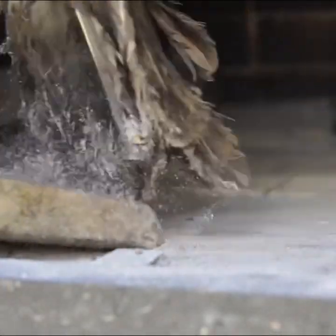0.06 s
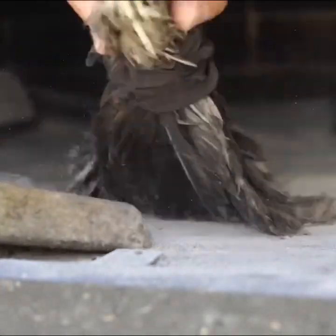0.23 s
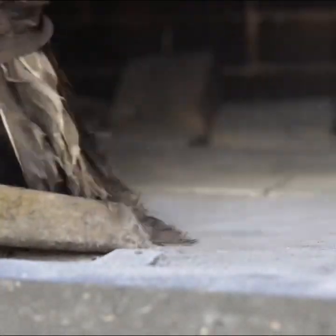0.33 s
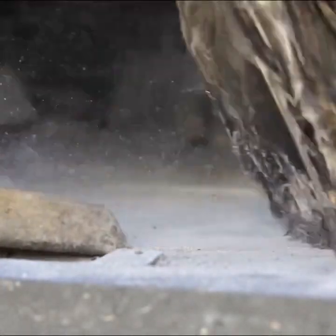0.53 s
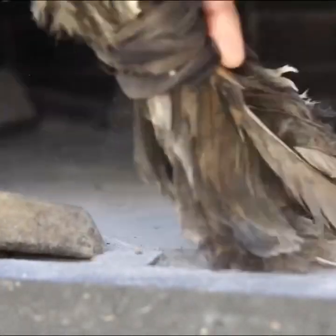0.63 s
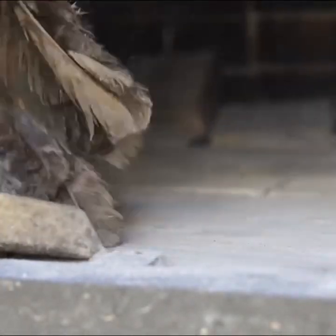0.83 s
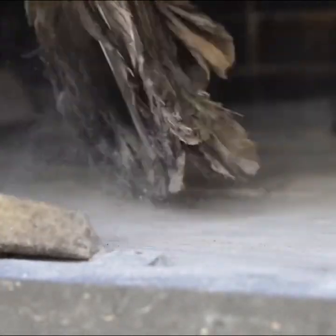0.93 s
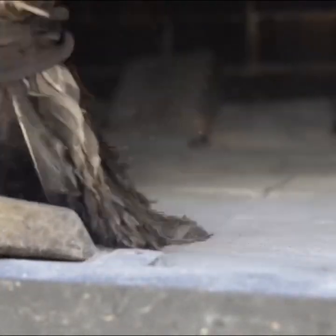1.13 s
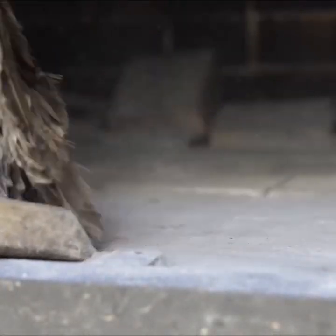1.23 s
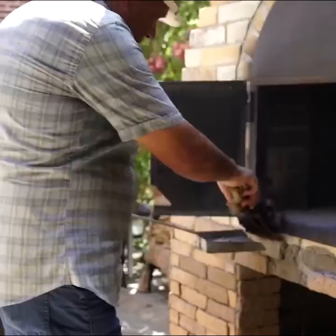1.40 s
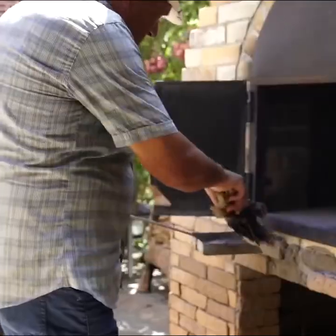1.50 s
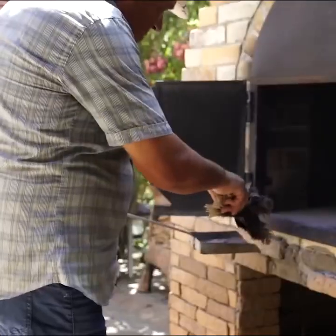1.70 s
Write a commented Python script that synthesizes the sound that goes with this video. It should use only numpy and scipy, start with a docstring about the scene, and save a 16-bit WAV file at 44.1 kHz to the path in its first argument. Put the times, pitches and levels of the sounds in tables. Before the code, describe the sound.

Feathers brush over a stone oven floor three times, quills crackling and snapping close by.

```python
"""A bundle of feathers sweeps the stone floor of a brick oven in three strokes, close by.
First come a small snap and a soft, low bump. Then each stroke lands with a crunch of bending quills,
a few of which snap past one another, and trails off as the soft vanes swish over gritty stone.
The oven rings faintly behind each stroke. Near 1.4 seconds the close sound stops abruptly,
and one last faint, distant stroke is heard over the hush of the yard outside."""
import sys
import numpy as np
from scipy import signal
from scipy.fft import rfft, irfft
from scipy.io import wavfile
from scipy.ndimage import uniform_filter1d

SR = 44100
rng = np.random.default_rng(int(sys.argv[2]) if len(sys.argv) > 2 else 0)


def generate_wav(signal):
    """Clip the signal to [-1, 1] and save it as 16-bit WAV at the path in sys.argv[1]."""
    frames = np.transpose(np.atleast_2d(signal))
    scaled = np.clip(frames, -1, 1) * 32767
    pcm = np.round(scaled).astype(np.int16)
    wavfile.write(sys.argv[1], SR, pcm)


N = 77175
T = np.arange(N) / SR  # time in seconds
SWISH_SLIPS_PER_S = 14000

# The notes a quill rings at. Each row: pitch in Hz, width in Hz, relative level in dB.
QUILL_NOTES = [(3525, 58, -2), (4115, 51, -14.5), (4720, 95, -14.5)]
# The notes a feather's stiff shaft rings at. Each row: pitch in Hz, width in Hz, relative level in dB.
SHAFT_NOTES = [(1580, 80, 0), (2221, 37, 3.5), (2330, 37, -3), (2569, 120, 2.5), (2593, 68, -7)]
# The bright tone of a feather's crack. Each row: frequency in Hz, relative level in dB.
CRACK_TONE = [(200, -30), (600, -5), (1800, -21), (3100, -26), (4400, 1.5), (5100, -2.5), (6400, 5.5),
              (7600, 2), (8400, -4), (12000, -7), (16000, -9)]


def vanes():
    """The soft sides of the feathers drag over grit: tiny slips whose level and tone follow the hand."""
    # How the vanes rub the stone, in consecutive stretches that join into one curve. # Each row: time in
    # seconds, relative level in dB, treble lift in dB, bass lift in dB.
    rubs = [
        [(0.0, -44, 9, 4), (0.01, -42.5, 7, -18), (0.05, -54.5, -6.5, 0), (0.078, -53, -6.5, 4),
         (0.14, -78, -1, -24), (0.16, -86, -11, 0)],
        [(0.16, -65.5, -1, -3), (0.248, -33.5, 2.5, -17), (0.296, -38, 3.5, 9), (0.416, -46.5, 2, 12.5),
         (0.48, -71, 3, 11)],
        [(0.48, -71, 9.5, 0), (0.552, -35, -1, 3), (0.61, -22, 12, 3), (0.62, -20, -3.5, 4),
         (0.666, -29, 9, -7), (0.68, -42, -2, -8)],
        [(0.68, -14, -4, -21), (0.772, -40, 2, -19), (0.812, -46, -9.5, -13), (0.838, -49.5, 1.5, -2),
         (0.89, -65.5, 5, 4), (0.944, -68, -16, 0), (0.95, -82, 0, -4)],
        [(0.95, -75, -6.5, 5), (1.006, -54, -6, 4), (1.016, -71, 7, 4), (1.034, -53, -9, 20),
         (1.048, -68, 9, -4), (1.068, -37.5, -9, 3), (1.09, -38.5, -11, -4)],
        [(1.09, -42.5, 4, -10), (1.102, -40, 7.5, 0), (1.128, -40.5, -4, 5.5), (1.168, -37, 5.5, -11),
         (1.24, -48.5, -1.5, 7)],
        [(1.24, -50, 5, -2), (1.264, -60, -8, 1), (1.27, -41.5, 3, -5), (1.288, -67, 5, -6), (1.35, -86, 5, -6),
         (1.354, -68.5, 2, 0), (1.42, -53.5, 0.5, -6)],
    ]
    # The tone of the swish. Each row: frequency in Hz, relative level in dB.
    swish_tone = [(100, -31), (250, -18.5), (420, -6), (600, -5.5), (780, -2.5), (950, -4.5), (1400, -1.5),
                  (1900, -4), (2700, 1), (3800, -4), (6200, -3.5), (7400, -7), (8600, -15), (16000, -20.5)]
    times, *columns = np.transpose(np.vstack(rubs))
    level_db, treble_db, bass_db = (np.interp(T, times, column) for column in columns)
    swish = colour(grains(SWISH_SLIPS_PER_S, spread_db=2), swish_tone) * amp(wander(rate_hz=120))
    body, bass = lowpass(swish, hz=2600), lowpass(swish, hz=450)
    middle, treble = body - bass, swish - body
    # Past a certain point, pressing harder mostly bends the quills and adds little swish.
    full_db, boost_db = -37, 3
    give_db = 0.9 * np.maximum(level_db - full_db, 0)
    return amp(boost_db + level_db - give_db) * (amp(bass_db) * bass + middle + amp(treble_db) * treble)


def crunch():
    """Pressed down, bent quills grind together in clumps of clicks over a slightly unsteady hollow note."""
    # The bundle pressing on the stone. Each row: start in seconds, length in seconds,
    # then the levels in dB of the grinding, the shafts, the quills and the hollow note.
    presses = [(0.233, 0.052, -31.5, -39.5, -33, -41), (0.535, 0.073, -30, -32.5, -31, -40.5),
               (0.634, 0.026, -27.5, -26.5, -31.5, -54), (1.098, 0.082, -36, -43.5, -40, -58.5)]
    slips = grains(per_s=4000, spread_db=1.5) * amp(1.64 * wander(rate_hz=150))
    # The tone of the grinding. Each row: frequency in Hz, relative level in dB.
    grind_tone = [(150, -36), (400, -5.5), (1000, 4.5), (1900, -16), (2600, -9), (3150, -24), (3500, 7),
                  (4400, -8.5), (5100, -6), (6400, 9.5), (7500, 2.5), (8400, -0.5), (16000, -13)]
    hollow_hz = 421 * (1 + 0.015 * wander(rate_hz=47))
    hollow = evened(np.sin(2 * np.pi * np.cumsum(hollow_hz) / SR))
    quills = steadied(ring(slips, QUILL_NOTES), span_s=0.012)
    voices = [colour(slips, grind_tone), ring(slips, SHAFT_NOTES), quills, hollow]
    return sum(burst(start, length, rise_s=0.0088, fall_s=0.018) * amp(db) * voice
               for start, length, *levels in presses for db, voice in zip(levels, voices))


def snaps():
    """Each snap is a quick run of clicks in shaft and tips, and sets one quill ringing roughly."""
    # Quills snapping past one another.
    # Each row: start in seconds, then the relative levels in dB of shaft, ringing quill and crack.
    quill_snaps = [(0.006, -36.5, -28, -35.5), (0.1323, -65, -58, -57.5), (0.187, -55, -71, -49),
                   (0.210, -61, -35, -35.5), (0.2355, -53, -43, -25), (0.24, -34, -21, -33),
                   (0.2487, -44, -34, -24.5), (0.254, -41, -18, -26.5), (0.264, -35, -18, -24.5),
                   (0.278, -32.5, -31, -33), (0.2857, -38, -22.5, -49), (0.293, -37, -26, -25),
                   (0.496, -64, -42.5, -41.5), (0.5238, -43, -45.5, -33), (0.548, -41, -31, -32),
                   (0.562, -47, -21.5, -30), (0.575, -23, -15, -18), (0.593, -36.5, -25, -23),
                   (0.602, -27, -15, -39), (0.608, -32, -28, -20), (0.6268, -36, -14.5, -19),
                   (0.6465, -25, -24.5, -24), (0.660, -37, -35, -25.5), (0.690, -31.5, -31, -31),
                   (0.919, -57.5, -52.5, -52.5), (0.979, -62, -54, -46.5), (1.0002, -53.5, -39.5, -40),
                   (1.027, -55, -60, -46), (1.094, -35.5, -33, -25.5), (1.102, -45, -40, -35),
                   (1.107, -37, -39, -32), (1.135, -30.5, -26.5, -27), (1.162, -28, -48, -44),
                   (1.179, -32, -28, -26.5), (1.202, -37.5, -34.5, -28.5), (1.251, -47, -38.5, -41),
                   (1.2668, -38, -30, -33.5), (1.329, -72, -57, -50.5), (1.413, -54, -50, -46.5)]
    # The bright notes of the quill tips. Each row: pitch in Hz, width in Hz, relative level in dB.
    tip_notes = [(5770, 160, 7.5), (6240, 110, 4), (5960, 200, -16.5), (7260, 62, -6), (7260, 120, -2.5),
                 (7350, 78, -3), (7450, 80, -25.5)]
    slips = grains(per_s=7800, spread_db=3)
    shaft = amp(-0.5) * steadied(ring(ring(slips, SHAFT_NOTES), SHAFT_NOTES), span_s=0.005)
    tips = amp(-4.5) * ring(slips, tip_notes)
    crack = amp(-1.5) * steadied(colour(slips, CRACK_TONE) + tips, span_s=0.0087)
    shaky_time = np.cumsum(1 + 0.02203 * wander(rate_hz=296)) / SR  # makes the ringing rattle
    out = np.zeros(N)
    for start, shaft_db, ring_db, crack_db in quill_snaps:
        detune, phase = rng.uniform(-1, 1, 2)
        tuning = 1 + 0.006 * detune  # each quill rings a little higher or lower
        quill = sum(amp(db) * np.sin(2 * np.pi * (hz * tuning * shaky_time + phase))
                    for hz, _, db in QUILL_NOTES)
        clicks = amp(crack_db) * crack + amp(shaft_db) * shaft
        out += burst(start, hold_s=0.0039, rise_s=0.00048, fall_s=0.0044) * clicks
        out += burst(start, hold_s=0.0069, rise_s=0.002, fall_s=0.0014) * amp(ring_db + 1.5) * quill
    return out


def scrape():
    """The bundle sings faintly during the long drag."""
    # The notes of the dragged bundle. Each row: pitch in Hz, width in Hz, relative level in dB.
    notes = [(781, 34, -1), (1233, 110, -4.5)]
    song = steadied(ring(ring(rng.standard_normal(N), notes), notes), span_s=0.038)
    return amp(-42.5) * burst(start_s=0.705, hold_s=0.07, rise_s=0.0043, fall_s=0.0091) * song


def rustle():
    """Loose feather tips give a light, dry crackle as the bundle is swung back."""
    # The rustles between strokes. Each row: start in seconds, length in seconds, level in dB.
    rustles = [(0.459, 0.03, -54.5), (0.502, 0.024, -49.5), (0.527, 0.027, -37), (1.018, 0.03, -52)]
    crackle = colour(grains(per_s=5200, spread_db=3), CRACK_TONE)
    return crackle * sum(amp(db) * burst(start, length, rise_s=0.002, fall_s=0.008)
                         for start, length, db in rustles)


def walls(x):
    """The oven's nearby floor and walls add a few quick echoes."""
    # The first echoes. Each row: delay in seconds, level in dB.
    echoes = [(.0021, -21.5), (.0037, -23), (.0056, -16.5), (.0083, -22)]
    return x + sum(amp(db) * np.interp(T - delay, T, x, left=0) for delay, db in echoes)


def oven(x):
    """Sound bounces around the brick chamber and leaves a short, fading tail."""
    # How long the oven rings. Each row: frequency in Hz, seconds to fade by 60 dB.
    fade_times = [(300, 0.36), (900, 0.083), (2200, 0.31), (3500, 0.12), (6000, 0.2), (14000, 0.193)]
    hz, t, noise = signal.stft(rng.standard_normal(SR // 2), SR, nperseg=256)
    fade = amp(-60 * t / read(fade_times, hz)[:, None])
    _, tail = signal.istft(noise * fade, SR, nperseg=256)
    gap = np.zeros(round(0.0045 * SR))  # the tail arrives a moment late
    tail = np.concatenate([gap, tail / np.linalg.norm(tail)])
    return amp(-17) * signal.fftconvolve(x, tail)[:N]


def far_sweep():
    """A faint, dull brush stroke at a distance."""
    # The tone of the distant stroke. Each row: frequency in Hz, relative level in dB.
    far_tone = [(200, -30), (600, 1), (1000, 1), (2000, -2.5), (3500, -17), (7000, -7.5), (9000, -22),
                (16000, -35)]
    swish = colour(grains(SWISH_SLIPS_PER_S, spread_db=1.5), far_tone)
    return amp(-53) * burst(start_s=1.578, hold_s=0.02, rise_s=0.008, fall_s=0.05) * swish


def yard():
    """An outdoor hush that dips briefly, faint hiss, a different rumble in each ear and one low bump."""
    # The tones of the hush, microphone hiss and rumble. Each row: frequency in Hz, relative level in dB.
    hush_tone = [(60, -42), (130, -11), (220, -8), (370, -4), (620, -5), (1050, -9.5), (2900, -18.5),
                 (7000, -20.5), (9000, -29), (15000, -43)]
    hiss_tone = [(100, -9), (3000, -5), (7000, -5), (9000, -5), (16000, -10)]
    rumble_tone = [(20, -2), (60, 1.5), (130, 1), (200, -16), (300, -37), (1000, -70)]
    # How loud the hush is. Each row: time in seconds, level in dB.
    hush_levels = [(0, -57.5), (0.95, -57.5), (1.3, -55.5), (1.421, -58.5), (1.424, -87), (1.47, -62),
                   (1.55, -55.5), (1.75, -57.5)]
    hush = colour(rng.standard_normal(N), hush_tone) * amp(np.interp(T, *np.transpose(hush_levels)))
    hiss = amp(-67.5) * colour(rng.standard_normal(N), hiss_tone)
    rumble = amp(-71.5) * np.array([colour(rng.standard_normal(N), rumble_tone) for _ in range(2)])
    bump_note = [(96.5, 80, 0)]  # pitch in Hz, width in Hz, relative level in dB
    bump = ring(ring(rng.standard_normal(N), bump_note), bump_note)
    swell = np.exp(-((T - 0.056) / 0.036) ** 2)  # comes and goes right at the start
    return hush + hiss + rumble + amp(-55.5) * bump * swell


def amp(db):
    """Turns decibels into a number to multiply a sound by."""
    return 10 ** (np.asarray(db) / 20)


def evened(x):
    """Scales a signal to an average strength (rms) of 1."""
    return x / np.sqrt(np.mean(x ** 2) + 1e-20)


def read(points, hz):
    """Reads between a table's rows, giving each octave about equal room."""
    row_hz, values = np.transpose(points)
    return np.interp(np.log(hz + 1), np.log(row_hz + 1), values)


def colour(x, tone):
    """Shapes a sound's lows and highs to follow a tone table, at strength 1."""
    gains = amp(read(tone, np.fft.rfftfreq(N, 1 / SR)))
    return evened(irfft(rfft(x) * gains, N))


def ring(x, notes):
    """Makes a sound ring at the given notes, at strength 1; narrower notes ring longer."""
    return evened(sum(amp(db) * evened(signal.lfilter(*signal.iirpeak(hz, hz / width, SR), x))
                      for hz, width, db in notes))


def steadied(x, span_s):
    """Evens out the slow swells of a ringing sound."""
    power = uniform_filter1d(x ** 2, max(round(span_s * SR), 2))
    return x / np.sqrt(abs(power) + 1e-6)


def wander(rate_hz):
    """A smooth random wobble of strength 1, mostly slower than rate_hz."""
    divisor = 1 + (np.fft.rfftfreq(N, 1 / SR) / rate_hz) ** 4
    return evened(irfft(rfft(rng.standard_normal(N)) / divisor, N))


def grains(per_s, spread_db):
    """Tiny slips click at random moments, a few of them larger than the rest."""
    size = amp(spread_db * np.minimum(rng.exponential(1, N), 4))
    return evened(size * rng.choice([-1., 1.], N) * (rng.random(N) < per_s / SR))


def burst(start_s, hold_s, rise_s, fall_s):
    """A loudness curve that rises, holds and dies away."""
    age = np.maximum(T - start_s, 0)
    return (1 - np.exp(-age / rise_s)) * np.exp(-np.maximum(age - hold_s, 0) / fall_s)


def lowpass(x, hz):
    """Softens everything above hz."""
    return signal.sosfiltfilt(signal.butter(1, hz, fs=SR, output="sos"), x)


def scene():
    """The brush, centred between the ears, in front of the oven and the yard."""
    brush = walls(vanes() + scrape() + crunch() + snaps() + rustle())
    stop_s, fade_s = 1.422, 0.0018  # the close sound stops abruptly
    close = (brush + oven(brush)) * np.clip((stop_s - T) / fade_s + 1, 0, 1)
    return close + far_sweep() + yard()


def record(dry):
    """Cuts away the very highest treble."""
    top_hz = 15800
    treble_cut = signal.firwin(511, top_hz, window=("kaiser", 9), fs=SR)
    return signal.oaconvolve(dry, treble_cut[None], "same")


dry = scene()
out = record(dry)
generate_wav(out)
```